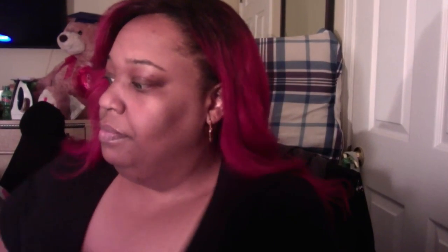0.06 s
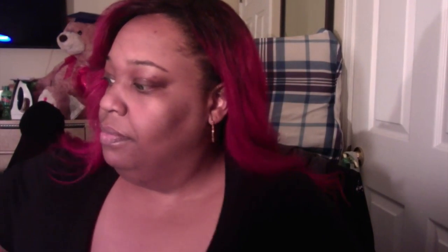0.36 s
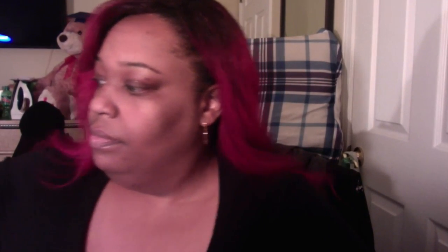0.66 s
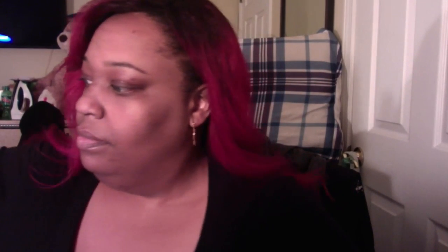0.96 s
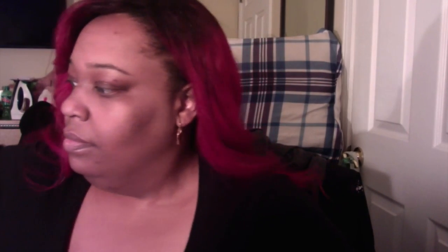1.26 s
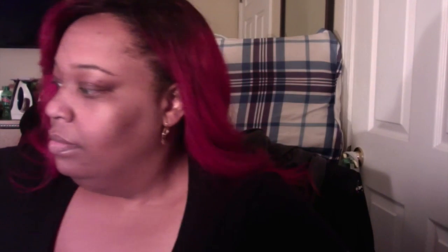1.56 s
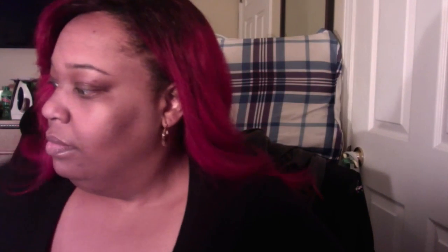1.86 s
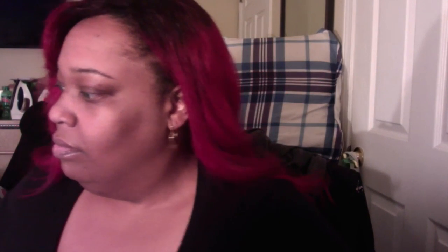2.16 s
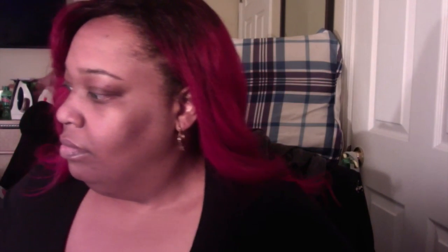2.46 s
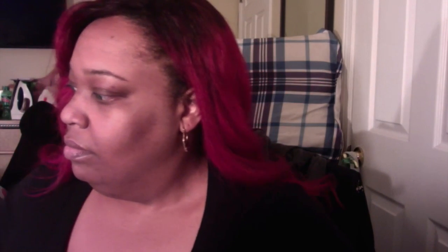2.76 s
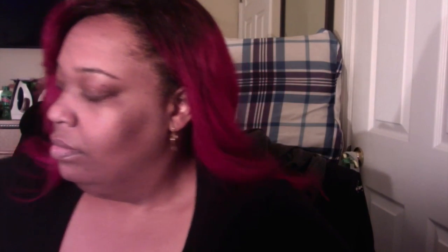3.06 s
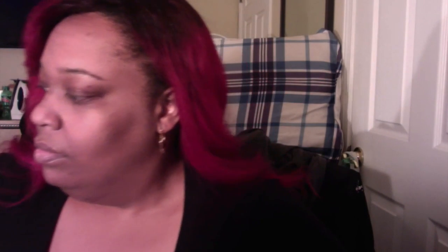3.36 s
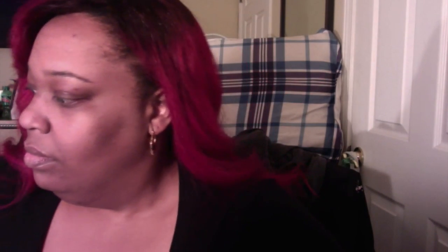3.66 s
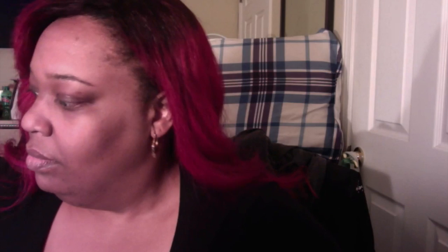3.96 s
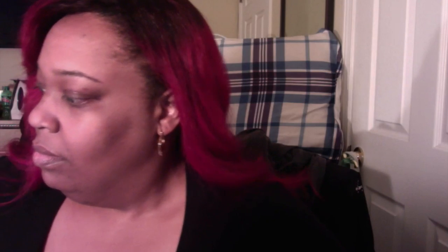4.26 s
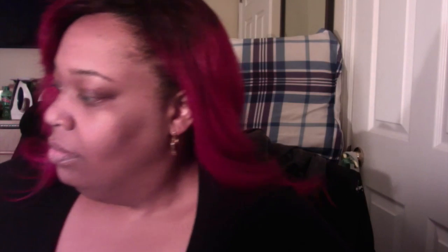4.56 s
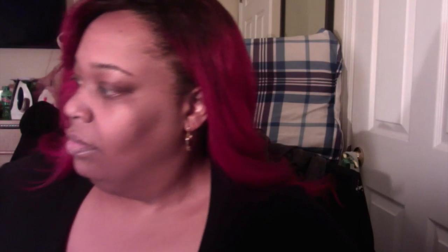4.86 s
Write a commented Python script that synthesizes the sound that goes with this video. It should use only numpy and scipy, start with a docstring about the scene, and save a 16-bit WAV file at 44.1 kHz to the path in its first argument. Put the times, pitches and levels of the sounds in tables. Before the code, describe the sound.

A parcel is pulled open by hand indoors, its paper rustling and ripping over soft, hollow bumps.

```python
"""Packing paper crackles as a parcel is pulled open and rummaged through by hand in a small furnished room.
Creases buckle with sharp snaps over swarms of tiny crinkles; broad panels flop with a dull crunch.
Sheets slide with a fine hiss and tear in dense rips.
Underneath, the hollow package rustles, bumps and answers finger taps."""
import sys
import numpy as np
from scipy import signal
from scipy.fft import rfft, irfft
from scipy.io import wavfile
from scipy.ndimage import uniform_filter1d, map_coordinates

SR = 44100
rng = np.random.default_rng(int(sys.argv[2]) if len(sys.argv) > 2 else 0)


def digitize_waveform(pressure):
    """Quantize a signal to 16-bit integers and store it at the path in sys.argv[1].

    Rows of a 2-D input are taken as channels; values are limited to [-1, 1].
    """
    field = np.atleast_2d(pressure).T
    bounded = np.clip(field, -1, 1)
    quanta = np.round(bounded * 32767).astype(np.int16)
    wavfile.write(sys.argv[1], SR, quanta)


N = 221631
TIME = np.arange(N) / SR

# Paper treble spectrum. Each row: frequency in Hz, gain in dB.
HISS_SPECTRUM = [(3800, -40.5), (5500, -6.5), (6200, -6.5), (7500, 1.5), (8300, 1.5), (11000, 4.5),
                 (13500, 5), (16000, -5)]
# Package resonances. Each row: frequency in Hz, width in Hz, gain in dB.
PACKAGE_MODES = [(525.8, 43, 11.5), (630.3, 26.5, 4), (817, 11, 3), (1174, 19, 2)]


def from_db(db):
    """Decibels to gain."""
    return 10 ** (np.asarray(db) / 20)


def power_sum_db(gains):
    """Joint level of uncorrelated sounds."""
    return 10 * np.log10(sum(gain ** 2 for gain in gains))


def unit_rms(x):
    """Scale to rms 1."""
    return x / np.sqrt(np.mean(x ** 2) + 1e-20)


def blend(a, b, share):
    """Equal-power mix; share is the power fraction of b."""
    return np.sqrt(1 - share) * unit_rms(a) + np.sqrt(share) * unit_rms(b)


def at_hz(points, hz):
    """Interpolate a table over log frequency."""
    known_hz, value = np.transpose(points)
    return np.interp(np.log(np.maximum(hz, 1)), np.log(known_hz), value)


def colour(x, spectrum, size=4096):
    """Minimum-phase filter from (Hz, dB) points."""
    gain = from_db(at_hz(spectrum, np.arange(size // 2 + 1) * SR / size))
    cepstrum = irfft(np.log(gain))
    cepstrum[1:size // 2] *= 2
    cepstrum[size // 2 + 1:] = 0
    return signal.fftconvolve(x, irfft(np.exp(rfft(cepstrum))))[:len(x)]


def resonance(x, hz, width_hz):
    """Two-pole resonator, peak gain 1."""
    r = np.exp(-np.pi * width_hz / SR)
    feedback = [1, -2 * r * np.cos(2 * np.pi * hz / SR), r * r]
    return signal.lfilter(np.array([1, 0, -1]) * (1 - r * r) / 2, feedback, x)


def drift(per_s):
    """Slow random wander, rms 1."""
    knots = rng.standard_normal(N // 20)
    return unit_rms(np.interp(TIME * per_s, np.arange(len(knots)), knots))


def swell(start_s, swell_s, hold_s, fade_s):
    """Gain of one movement, full from start_s; swell_s and fade_s each span 20 dB."""
    early_s = np.maximum(start_s - TIME, 0)
    late_s = np.maximum(TIME - start_s - hold_s, 0)
    return from_db(-20 * np.minimum(early_s / swell_s + late_s / fade_s, 10))


def grains(per_s, uneven, grain_s, rub):
    """Fibre slips: short puffs of uneven size over smooth rubbing, at steady mean power."""
    born = rng.random(N) < per_s / SR
    energy = rng.exponential(1, N) ** uneven
    power = signal.lfilter([1], [1, -np.exp(-2 / (grain_s * SR))], born * energy + 1e-18)
    power /= uniform_filter1d(power, size=1500) + 1e-12
    return np.sqrt(power + rub ** 2) * rng.standard_normal(N)


def background(level_db):
    """Faint, steady low noise."""
    # Each row: frequency in Hz, gain in dB.
    floor_spectrum = [(25, -37), (80, 17.5), (200, -2), (1500, -15), (15000, -19)]
    return from_db(level_db) * unit_rms(colour(rng.standard_normal(N), floor_spectrum))


def room_response(wall_db, tail_db, wall_s=0.0064):
    """One scattered bounce off a near surface, plus a diffuse tail that dies sooner in the treble."""
    # Each row: frequency in Hz, 60 dB decay time in seconds.
    decay_times = [(150, 0.64), (800, 0.29), (2200, 0.14), (15000, 0.091)]
    t = TIME[:SR // 2]
    hz = np.arange(len(t) // 2 + 1) * SR / len(t)
    octaves_hz = np.geomspace(125, 16000, 8)
    white = rfft(rng.standard_normal(len(t)))
    tail = 0
    for centre_hz, share in zip(octaves_hz, np.eye(len(octaves_hz))):
        band = irfft(white * at_hz(np.c_[octaves_hz, share], hz), len(t))
        tail = tail + band * from_db(-60 * t / at_hz(decay_times, centre_hz))
    tail *= 1 - np.exp(-(t / 0.00087) ** 2)
    bounce = rng.standard_normal(len(t)) * (t > wall_s) * np.exp(-np.abs(t - wall_s) / 0.00086)
    return (from_db(tail_db) * tail / np.linalg.norm(tail)
            + from_db(wall_db) * bounce / np.linalg.norm(bounce))


def room(x, wall_db, tail_db):
    """Add echoes whose pattern shifts as the paper moves."""
    turn = 1.31 * drift(per_s=7)
    places = x * np.cos(turn), x * np.sin(turn)
    return x + sum(signal.fftconvolve(part, room_response(wall_db, tail_db))[:N] for part in places)


def close_reflections(x):
    """A hard surface and a moving fold comb the rustle."""
    # Each row: delay in seconds, wander as a fraction of it, gain in dB.
    bounces = [(.00177, 0.0028, -20.5), (0.0003475, 0.21, -10)]
    for delay_s, wander, db in bounces:
        read_at = SR * (TIME - delay_s * (1 + wander * drift(per_s=7.1)))
        x = (x + from_db(db) * map_coordinates(x, [read_at])) / np.hypot(1, from_db(db))
    return x


def package_rustle(hollow_db):
    """Scraping paper sets the hollow package sounding."""
    # Each row: frequency in Hz, gain in dB.
    hollow_spectrum = [(330, -33.5), (430, -7.5), (520, 0.5), (700, 6), (1000, 4.5), (1350, 3),
                       (1800, -10.5)]
    scrape = grains(per_s=240, uneven=1, grain_s=0.013, rub=0.41)
    ringing = sum(from_db(db) * resonance(scrape, hz, width_hz) for hz, width_hz, db in PACKAGE_MODES)
    return from_db(hollow_db + 2.13) * unit_rms(colour(scrape + ringing, hollow_spectrum))


def package_bumps(hollow_db):
    """The soft walls shake with the rustle and thud when the hands knock them."""
    # Each row: time in seconds, relative level in dB.
    knocks = [(0.3, -57), (1.207, -52), (1.259, -52), (1.829, -59), (2.242, -54), (2.273, -51),
              (3.08, -62.5), (3.782, -56), (3.811, -51.5), (4.397, -51), (4.437, -46.5), (4.521, -51.5)]
    # Each row: frequency in Hz, gain in dB.
    bump_spectrum = [(25, -27), (50, -31.5), (105, -9.5), (140, 1.5), (190, -2.5), (275, 1.5), (380, -7.5),
                     (520, -15)]
    shaking = from_db(-72 + 0.36 * (hollow_db + 60))   # follows 36% of the rustle's dB swing
    thuds = [from_db(db) * swell(s, swell_s=0.051, hold_s=0.00063, fade_s=0.026) for s, db in knocks]
    rumble = colour(grains(per_s=150, uneven=0.25, grain_s=0.0057, rub=0.54), bump_spectrum)
    return from_db(power_sum_db([shaking] + thuds) + 6.5) * unit_rms(rumble)


def finger_taps(contact_s):
    """A soft fingertip excites the package modes: a short hollow knock."""
    # Each row: start in seconds, level in dB.
    taps = [(1.826, -58), (2.14, -57), (2.225, -52.5), (2.387, -56.5), (3.5, -56), (3.685, -52),
            (3.818, -50), (4.311, -53), (4.93, -56.5)]
    out, t = np.zeros(N + SR), TIME[:SR]
    push = t * np.exp(-t / contact_s)
    for start_s, level_db in taps:
        knock = sum(rng.uniform(0.33, 1) * from_db(db) * resonance(push, hz, width_hz)
                    for hz, width_hz, db in PACKAGE_MODES)
        out[int(start_s * SR):][:SR] += from_db(level_db) * knock / np.std(knock[:SR // 50])
    return out[:N]


def panel_flops(broadband, q):
    """A wide panel gives way, slower and lower than a crease."""
    # Each row: start in seconds, level in dB, pitch in Hz, energy decay time in seconds.
    flops = [(0.105, -44, 2250, 0.0046), (0.574, -47.5, 1840, 0.021), (0.727, -53, 2500, 0.011),
             (2.021, -49, 1480, 0.0078), (2.056, -56, 1800, 0.0036), (2.142, -49, 1850, 0.0046),
             (3.009, -50, 1140, 0.0032), (3.146, -57, 2660, 0.0037), (3.498, -48, 590, 0.007),
             (3.578, -49, 1260, 0.036), (4.308, -41, 1670, 0.0056), (4.924, -45.5, 2980, 0.0081)]
    # Each row: frequency in Hz, gain in dB.
    panel_spectrum = [(150, -16.5), (420, 3.5), (540, 9), (2400, 12.5), (12000, -19.5)]
    out = np.zeros(N)
    crunch = grains(per_s=570, uneven=0.74, grain_s=0.0022, rub=0.58)
    for start_s, level_db, hz, decay_s in flops:
        part = slice(int(start_s * SR), int(start_s * SR) + SR // 10)
        panel = resonance(crunch[part], hz, hz / q) + broadband * crunch[part]
        t = TIME[:len(panel)]
        envelope = (1 - np.exp(-t / 0.00028)) * np.exp(-t / (2 * decay_s))
        out[part] += from_db(level_db) * envelope * unit_rms(colour(panel, panel_spectrum))
    return out


def hand_levels():
    """Crinkle, hiss and hollow rustle in dB: pulls, squeezes and slides over light rubbing."""
    # Each row: time in seconds, level in dB.
    rubbing = [(0, -65.5), (0.55, -83), (0.72, -62), (1.1, -64.5), (1.56, -60.5), (1.65, -67), (1.8, -76),
               (2.1, -66), (2.52, -61), (2.64, -67.5), (2.72, -77), (2.9, -100), (3.02, -65), (3.28, -73),
               (3.95, -59.5), (4.05, -70), (5.03, -60)]
    # Each row: start of full strength, swell, hold, fade in seconds; crinkle, hiss, hollow in dB.
    strokes = [(0.06, 0.0043, 0.0067, 0.029, -45.5, -43.5, -76),
               (0.131, 0.049, 0.012, 0.039, -43, -36, -54),
               (0.175, 0.0088, 0.012, 0.041, -38.5, -33, -48.5),
               (0.283, 0.064, 0.037, 0.16, -37, -30, -46.5), (0.421, 0.023, 0.02, 0.031, -41, -29.5, -46.5),
               (0.481, 0.052, 0.026, 0.11, -47.5, -69, -52), (0.6, 0.09, 0.017, 0.075, -49, -43, -73),
               (0.856, .008, .022, 0.032, -48, -32, -75), (1.02, 0.041, 0.011, 0.043, -48, -46.5, -51),
               (1.143, 0.024, 0.0053, 0.088, -54, -45, -58),
               (1.23, 0.065, 0.084, 0.085, -41.5, -40.5, -47.5),
               (1.418, .01, 0.0045, 0.026, -44, -39.5, -57), (1.68, 0.013, 0.1, 0.041, -67, -55, -86),
               (1.817, 0.11, 0.022, 0.026, -52, -80, -57.5), (1.928, 0.14, 0.014, 0.082, -49.5, -80, -52.5),
               (2.256, 0.044, 0.04, 0.035, -45, -44, -46.5), (2.316, 0.013, 0.039, 0.09, -47.5, -44, -55),
               (2.379, 0.07, 0.067, 0.014, -50, -67, -55), (2.928, 0.0027, 0.015, 0.057, -59, -33.5, -82),
               (2.996, 0.0046, 0.011, 0.093, -65.5, -44.5, -82),
               (3.049, 0.01, 0.029, 0.052, -48.5, -34.5, -58), (3.201, 0.019, 0.018, 0.1, -73, -56, -98),
               (3.365, 0.048, 0.035, 0.13, -55, -37.5, -70), (3.467, .05, 0.021, .06, -50, -38, -61.5),
               (3.594, 0.015, 0.028, 0.1034, -49.5, -43.5, -53), (3.661, 0.061, 0.055, 0.1, -41, -32, -50),
               (3.776, 0.049, 0.02, 0.077, -36.5, -26, -50), (3.851, 0.067, 0.039, 0.04, -47.5, -42, -61.5),
               (4.154, 0.032, 0.099, 0.063, -77, -50.5, -94), (4.238, .015, 0.087, 0.03, -54.5, -37.5, -74),
               (4.369, 0.043, 0.18, 0.085, -40, -33, -46), (4.702, 0.21, 0.016, 0.026, -45, -40.5, -55),
               (4.738, 0.0097, 0.0095, .11, -46, -40.5, -61), (4.876, 0.019, 0.011, 0.064, -52, -58.5, -57),
               (5.016, 0.039, .035, .1, -51, -78, -54)]
    rub_db = np.interp(TIME, *np.transpose(rubbing))
    crinkle, hiss, hollow = [from_db(rub_db)], [from_db(rub_db + 1)], [from_db(rub_db - 7)]
    for start_s, swell_s, hold_s, fade_s, crinkle_db, hiss_db, hollow_db in strokes:
        effort = swell(start_s, swell_s, hold_s, fade_s)
        crinkle.append(from_db(crinkle_db) * effort)
        hiss.append(from_db(hiss_db) * effort)
        hollow.append(from_db(hollow_db) * effort)
    return power_sum_db(crinkle), power_sum_db(hiss), power_sum_db(hollow)


def facets(low_hz, high_hz, per_s, q, count):
    """Facets of many sizes crackle independently, each at its own pitch."""
    crackle = 0
    for hz in np.geomspace(low_hz, high_hz, count):
        slips = grains(per_s, uneven=1.1, grain_s=0.0035, rub=0.2)
        crackle = crackle + resonance(slips, hz, hz / q) / np.sqrt(hz)
    return unit_rms(crackle)


def paper_rustle(crinkle_db, hiss_db):
    """Paper rubs under a light touch, crackles in a firm grip, hisses sliding, rips when pulled hard."""
    # Each row: frequency in Hz, gain in dB.
    crinkle_spectrum = [(800, -8), (1350, 5), (1800, 13), (2400, 6.5), (3300, 5), (4100, 7.5), (5000, 5.5),
                        (5800, -6.5), (7500, -39)]
    tear_spectrum = [(500, -47), (1100, -5), (1850, 9.5), (2700, 4), (3400, 5.5), (7300, 2.5),
                     (10000, -6.5)]
    crumple_tilt = [(8000, 5), (16000, -4.5)]   # crumpling is duller than sliding
    # Broad resonances of a sliding sheet. Each row: frequency in Hz, width in Hz.
    sheet_modes = [(2400, 1340), (4750, 1770)]
    grip = np.clip((crinkle_db + 73.5) / 17, 0.1, 1)
    sliding = np.clip((hiss_db - crinkle_db + 2.5) / 14, 0, 1)
    tearing = np.clip((crinkle_db + 54) / 10, 0, 1) * sliding

    rub, fine_rub = rng.standard_normal((2, N))
    crackle = unit_rms(grains(per_s=190, uneven=0.63, grain_s=0.0037, rub=0.65))
    crackle += 1.5 * facets(1350, 6500, per_s=100, q=4.8, count=12)
    fibres = unit_rms(grains(per_s=260, uneven=1, grain_s=0.001, rub=0.4))
    fibres += 0.6 * facets(6500, 14000, per_s=70, q=12, count=7)
    rip, fine_rip = [grains(per_s=600, uneven=0.7, grain_s=0.0012, rub=0.6) for _ in range(2)]

    sheet = sum(resonance(resonance(rub, hz, width_hz), hz, width_hz) for hz, width_hz in sheet_modes)
    crinkle = colour(blend(rub, crackle, grip), crinkle_spectrum)
    middle = blend(blend(crinkle, sheet, sliding ** 2), colour(rip, tear_spectrum), tearing)
    crumple = colour(colour(blend(fine_rub, fibres, grip), HISS_SPECTRUM), crumple_tilt)
    treble = blend(crumple, colour(fine_rip, HISS_SPECTRUM), sliding ** 0.9)
    rustle = from_db(crinkle_db - 0.3) * middle + from_db(hiss_db - 7) * treble
    return rustle - (1 - tearing) * resonance(rustle, hz=6080, width_hz=610)   # tearing fills the notch


def crease_spectrum(spectrum, corner_hz, db_per_octave):
    """One crease's own weak resonances: random ripple, plus a slope above corner_hz."""
    hz = np.geomspace(200, 16000, 60)
    ripple_db = 3.8 * rng.standard_normal(len(hz))
    slope_db = db_per_octave * np.maximum(np.log2(hz / corner_hz), 0)
    return np.c_[hz, at_hz(spectrum, hz) + ripple_db + slope_db]


def crease_snaps(ring_s, broadband, q, size=2048):
    """A crease buckles with a bright crack; the facet beside it rings for a few cycles."""
    # Each row: start in seconds, ring level in dB, pitch in Hz, crack level in dB, crack top in Hz.
    snaps = [(0.0603, -44.5, 4800, -39.5, 14000), (0.0672, -56, 4770, -38.5, 13000),
             (0.1684, -50.5, 5070, -34, 8900), (0.1763, -38, 5270, -34.5, 14000),
             (0.2635, -36.5, 4660, -28.5, 15000), (0.2905, -52, 3580, -31, 13000),
             (0.3141, -32.5, 5640, -29, 12800), (0.3196, -54, 2290, -26.5, 13000),
             (0.3441, -57, 4870, -32, 12000), (0.3805, -42.5, 2330, -40.5, 13000),
             (0.4282, -41, 2970, -36, 11000), (0.4828, -45, 4360, -51, 12000),
             (0.591, -38.5, 1820, -31.5, 12700), (0.8513, -37, 2900, -41, 15000),
             (0.991, -45, 2320, -53, 10000), (1.1475, -36, 2300, -37.5, 8800),
             (1.2085, -37, 2320, -46, 10900), (1.244, -43, 3400, -41.5, 8000),
             (1.313, -39, 2420, -47, 12000), (1.4205, -39.5, 2400, -40, 8300),
             (1.487, -46, 5050, -52, 11000), (1.806, -48, 4400, -42.5, 10400),
             (1.8592, -39.5, 2900, -30, 15000), (1.924, -41, 1550, -46.5, 7100),
             (2.189, -60, 2470, -43.5, 9300), (2.208, -57, 5250, -43, 8160),
             (2.225, -41.5, 3150, -47, 9000), (2.2905, -45, 2950, -39.5, 12000),
             (2.327, -46, 4400, -43.5, 10000), (2.391, -42, 2200, -56, 7000),
             (2.425, -51, 1635, -44, 11100), (2.6, -53.5, 4340, -56, 10600),
             (2.631, -57, 3250, -56.5, 8300), (2.769, -47, 2660, -49.5, 11600),
             (2.926, -54.5, 4700, -47, 14700), (2.9565, -49.5, 4400, -42.5, 14100),
             (3.0753, -45.5, 5270, -36, 13000), (3.3717, -48.5, 4930, -33, 13900),
             (3.683, -40.5, 4280, -35, 12000), (3.7565, -35.5, 1660, -32, 13100),
             (3.7899, -33.5, 4050, -26.5, 14000), (3.8035, -37.5, 5370, -23, 11600),
             (3.959, -44, 3440, -60, 13000), (4.3639, -44, 2516, -35, 9050),
             (4.3703, -37, 2670, -23, 13000), (4.3762, -38, 2580, -30, 14000),
             (4.461, -59, 1680, -31, 10300), (4.4688, -33.5, 4630, -51, 8050),
             (4.5014, -40, 2360, -35.5, 12000), (4.5253, -46, 2530, -37, 12000),
             (4.6881, -37.5, 4800, -37, 14100), (4.7416, -41, 2360, -47, 11100),
             (4.839, -39, 4400, -46.5, 9700), (4.9324, -45.5, 4230, -61, 7000),
             (4.9688, -48, 2170, -39, 12000)]
    # Direct path and nearby surfaces. Each row: delay in seconds, gain in dB.
    arrivals = [(0, -4), (.0012, 0), (.0022, -11)]
    # Each row: frequency in Hz, gain in dB.
    facet_spectrum = [(200, -32), (450, -17.5), (560, 2), (1100, -8.5), (2200, 2), (5000, 0.5),
                      (6000, -3.5), (8000, -17.5)]
    out, t = np.zeros(N + size), TIME[:size]
    crack_s, settle_s = 0.00028, 0.0045
    span = np.sqrt(0.0048 * SR)   # unit energy to unit rms over 4.8 ms
    rise = 1 - np.exp(-t / 0.00034)
    pulses = sum(from_db(db) * np.exp(-((t - delay_s) / crack_s - 1) ** 2) for delay_s, db in arrivals)
    settling = from_db(-17) * rise * np.exp(-t / settle_s)
    noises = rng.standard_normal((len(snaps), 2, size))
    for (start_s, ring_db, hz, crack_db, top_hz), (ring_noise, crack_noise) in zip(snaps, noises):
        push = ring_noise * rise * np.exp(-t / ring_s)
        facet = resonance(push, hz, hz / q) + broadband * push
        ring = colour(facet, crease_spectrum(facet_spectrum, hz, db_per_octave=2.5))
        dryness = np.clip((crack_db - ring_db) / 13, 0, 1.4)
        burst = np.tanh(crack_noise) * np.hypot(pulses, settling * (2 - dryness))
        crack = colour(burst, crease_spectrum(HISS_SPECTRUM, top_hz, db_per_octave=-47.5))
        at = int(start_s * SR)
        out[at:at + size] += span * from_db(ring_db + 1.15) * ring / np.linalg.norm(ring)
        out[at:at + size] += span * from_db(crack_db) * crack / np.linalg.norm(crack)
    return out[:N]


def scene():
    """Paper and package in the room, over a faint background; mono."""
    crinkle_db, hiss_db, hollow_db = hand_levels()
    creases = crease_snaps(ring_s=0.0027, broadband=0.26, q=4.5)
    panels = panel_flops(broadband=0.23, q=4.5)
    transients = room(creases + panels + finger_taps(contact_s=0.00023), wall_db=-13, tail_db=-4.5)
    paper = room(close_reflections(paper_rustle(crinkle_db, hiss_db)), wall_db=-14.5, tail_db=-16.5)
    package = package_rustle(hollow_db) + package_bumps(hollow_db)
    return (transients + paper + package + background(level_db=-86.5))[None]


def record(dry):
    """Steep low-pass."""
    cutoff_hz = 15950
    return signal.sosfilt(signal.ellip(10, 0.1, 70, cutoff_hz, fs=SR, output="sos"), dry)


dry = scene()
out = record(dry)
digitize_waveform(out)
```